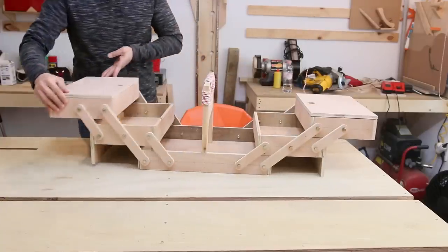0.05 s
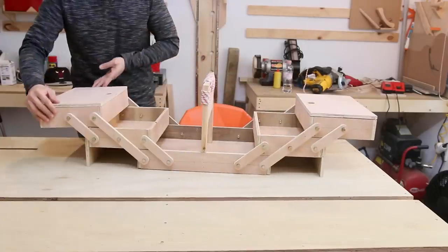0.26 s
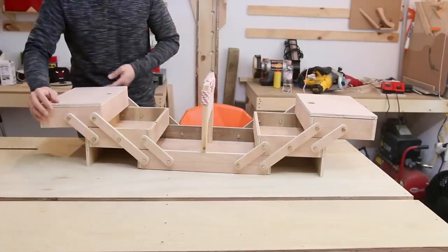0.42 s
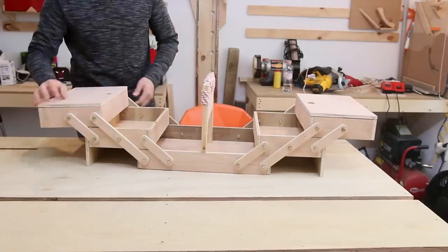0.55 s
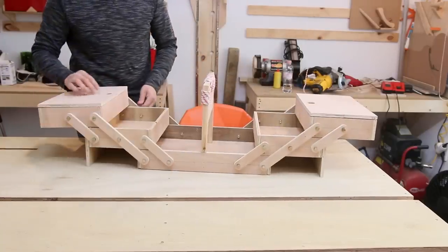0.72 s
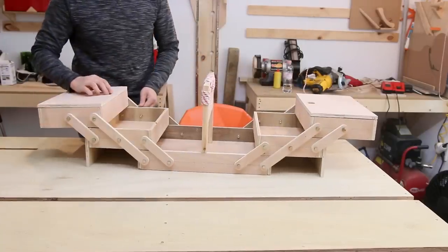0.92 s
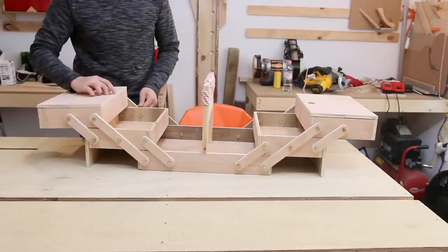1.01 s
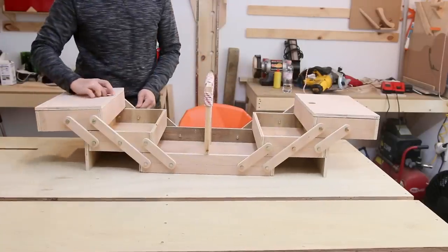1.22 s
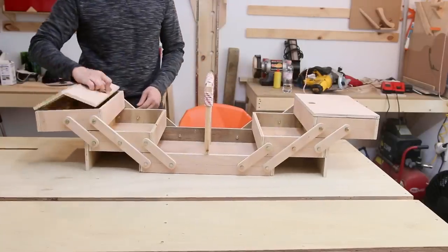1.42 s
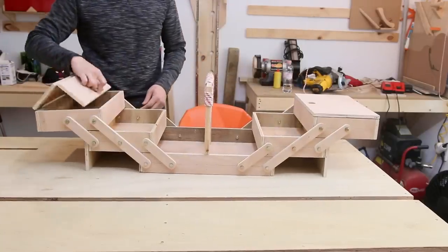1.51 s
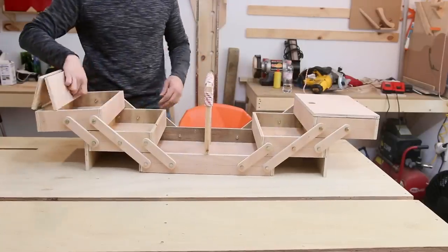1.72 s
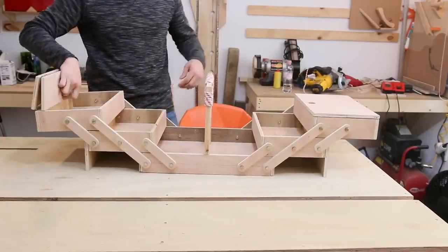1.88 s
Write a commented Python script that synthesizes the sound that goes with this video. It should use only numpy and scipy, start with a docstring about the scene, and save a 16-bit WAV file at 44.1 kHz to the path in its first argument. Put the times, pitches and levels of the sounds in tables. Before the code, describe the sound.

A wooden folding toolbox clatters open with a quick cluster of hollow knocks and a low bench thump, then faint finger taps, soft rubbing and a lighter lid knock in a small echoing workshop, heard fairly close.

```python
"""Wooden folding toolbox on a bench

Trays slide on their arms and clatter to a stop, fingers tap and slide over a lid, the lid swings up
and knocks on its stop. Knocks are short pushes and chatters ringing the wood; sliding is grainy noise.
The bench hums low from a few slow resonances, the workshop echoes the box, and quiet air lies behind."""
import sys
import numpy as np
from scipy import signal
from scipy.fft import rfft, irfft, next_fast_len
from scipy.io import wavfile
from scipy.ndimage import uniform_filter1d

SR = 44100
rng = np.random.default_rng(int(sys.argv[2]) if len(sys.argv) > 2 else 0)


def to_linear_factor(level_db):
    """Convert decibel levels (scalar or array-like) to linear amplitude factors."""
    exponent = np.asarray(level_db, float) / 20
    return 10 ** exponent


def generate_wav(signal):
    """Clip the signal to [-1, 1] and save it as 16-bit WAV at the path in sys.argv[1]."""
    frames = np.transpose(np.atleast_2d(signal))
    scaled = np.clip(frames, -1, 1) * 32767
    pcm = np.round(scaled).astype(np.int16)
    wavfile.write(sys.argv[1], SR, pcm)


N = 85995  # length in samples


def unit(x):
    """Scales a sound to an rms of 1."""
    return x / np.sqrt(np.mean(x ** 2) + 1e-20)


def along(points, hz):
    """Reads a curve of (Hz, value) points, with straight lines on a log frequency axis."""
    point_hz, value = np.transpose(points)
    return np.interp(np.log(hz + 1), np.log(point_hz + 1), value)


def filtered(x, response):
    """Multiplies the spectrum of x by a response, which is a function of frequency."""
    size = next_fast_len(N + SR // 2)
    hz = np.fft.rfftfreq(size, 1 / SR)
    return irfft(rfft(x, size) * response(hz), size)[..., :N]


def peak(f, hz, width_hz):
    """One resonance: it answers most strongly at hz and only after it is pushed."""
    return 1j * f * width_hz / (hz * hz - f * f + 1j * f * width_hz)


def wood(table):
    """Wood rings as a sum of resonances with alternating signs."""
    def response(f):
        return sum((-1) ** k * to_linear_factor(db) * peak(f, hz, width_hz)
                   for k, (hz, width_hz, db) in enumerate(table))
    return response


def spread(pair, alike, gain=lambda hz: 1):
    """Mixes two unrelated signals into a left and a right of the given likeness."""
    def mid_side_gain(hz):
        turn = np.arccos(np.clip(along(alike, hz), -1, 1)) / 2
        return gain(hz) * np.array([np.cos(turn), np.sin(turn)])
    mid, side = filtered(pair, mid_side_gain)
    return np.array([mid + side, mid - side])


def burst(length_s):
    """A gritty chatter of energy 1 that rises quickly and dies away."""
    rise_share, grit_db = 0.27, 5  # rise time as a share of the length; scatter of the grains
    u = np.arange(SR // 6) / (SR * length_s)
    noise, scatter = rng.standard_normal((2, len(u)))
    grains = noise * to_linear_factor(grit_db * scatter)
    x = grains * (1 - np.exp(-u / rise_share)) * np.exp(-2 * u)
    return x / np.linalg.norm(x)


def air():
    """The quiet workshop and the microphone's hiss: two noises, coloured and spread left and right."""
    # colour of the air: (pitch_hz, relative level_db)
    air_tone = [(15, -56), (45, -24.5), (70, -32.5), (130, 7), (200, -9), (320, -22), (800, -0.5),
                (1500, -10.5), (3000, -11.5), (6000, -15.5), (11500, -19.5), (12500, -36.5), (15500, -50.5)]
    # how alike left and right are: (pitch_hz, likeness from 0 to 1)
    air_alike = [(100, 1), (500, 0.7), (1500, 0.78), (4000, .1), (12000, .05)]
    noise = rng.standard_normal((2, N))
    return to_linear_factor(-75) * unit(spread(noise, air_alike, lambda hz: to_linear_factor(along(air_tone, hz))))


def workshop(x):
    """A fresh echo of the room: a noise tail in which each frequency dies at its own speed."""
    # time to die away by 60 dB: (pitch_hz, decay_s)
    decay = [(100, 0.29), (300, 0.33), (1000, 0.33), (2500, 0.32), (6000, 0.35), (12000, 0.6)]
    # how alike left and right are: (pitch_hz, likeness from 0 to 1)
    room_alike = [(100, 1), (400, 0.96), (1000, 0.82), (2500, 0.18), (6000, 0), (12000, 0.4)]
    gap_s = .004  # silence before the echo
    hz, t, grid = signal.stft(rng.standard_normal((2, SR)), SR, nperseg=256)
    fading = to_linear_factor(-60 * t / along(decay, hz)[:, None])
    tail = signal.istft(grid * fading, SR, nperseg=256)[1]
    tail = tail / np.linalg.norm(tail[0])
    late = np.pad(x, (round(gap_s * SR), 0))[None]
    echo = signal.fftconvolve(late, tail, axes=1)[:, :N]
    return spread(echo, room_alike)


def bench():
    """Weight arrives on the heavy top, which swells slowly into its low notes."""
    # weight arriving: (start_s, force_db)
    loads = [(0.252, 9.5), (0.29, 17), (0.498, -5.5), (1.305, -13), (1.77, -45), (1.878, -39)]
    # notes of the bench top: (pitch_hz, width_hz, level_db)
    notes = [(44.6, 13, -25), (84, 8, -12), (99.3, 4.7, -18), (156.2, 6.1, 9)]
    swell_hz = 25.7  # width of a second resonance on each note, for the slow build-up
    push = np.zeros(N)
    for start_s, force_db in loads:
        push[round(start_s * SR)] = to_linear_factor(force_db)

    def top(f):
        return sum(to_linear_factor(db) * peak(f, hz, width_hz) * peak(f, hz, swell_hz) for hz, width_hz, db in notes)
    return filtered(push, top)


def rub(curve, tone, grainy_db, fade_s):
    """Friction under a stroke: coloured noise of uneven grains, following a level curve, with echo."""
    point_s, db = np.transpose(curve)
    t = np.arange(N) / SR
    start, end = point_s[0], point_s[-1]
    fade = np.interp(t, [start - fade_s, start, end, end + fade_s], [0, 1, 1, 0])
    level = to_linear_factor(np.interp(t, point_s, db)) * fade
    unevenness = unit(uniform_filter1d(rng.standard_normal(N), size=150))
    grains = rng.standard_normal(N) * to_linear_factor(grainy_db * unevenness)
    x = level * unit(filtered(grains, lambda f: to_linear_factor(along(tone, f))))
    return x + to_linear_factor(3) * workshop(x)


def sliding_trays():
    """The trays slide: friction noise at the start."""
    # loudness of the slide before echo: (time_s, level_db)
    curve = [(0.0, -57.5), (0.034, -64), (0.21, -66.5)]
    # its colour: (pitch_hz, relative level_db)
    tone = [(60, -43.5), (150, -44), (280, 0.5), (350, -12.5), (480, 2.5), (570, -2.5), (700, -1),
            (1100, -4), (1600, -6), (4000, -15.5), (14000, -32.5), (16000, -62.5)]
    return rub(curve, tone, grainy_db=2.5, fade_s=0.084)


def hand_on_lid():
    """A hand strokes the lid: friction noise that comes and goes."""
    # loudness of the hand before echo: (time_s, level_db)
    curve = [(0.95, -73), (1.006, -83.5), (1.022, -90), (1.052, -74.5), (1.148, -62.5), (1.336, -57),
             (1.38, -65.5), (1.442, -91), (1.46, -68.5)]
    # its colour: (pitch_hz, relative level_db)
    tone = [(60, -54.5), (190, -27), (270, -7), (330, -4.5), (450, -6.5), (570, -11.5), (860, -6),
            (950, -10.5), (1300, -12.5), (2000, -20), (2500, -18), (2800, -25), (3200, -20.5), (6000, -31),
            (12000, -43), (16000, -59)]
    return rub(curve, tone, grainy_db=0, fade_s=0.065)


def hinge():
    """The lid's hinge rubs: friction noise of uneven grains."""
    # loudness of the hinge before echo: (time_s, level_db)
    curve = [(1.46, -86), (1.47, -97), (1.482, -78), (1.52, -68), (1.552, -78.5), (1.606, -69),
             (1.706, -77), (1.73, -82)]
    # its colour: (pitch_hz, relative level_db)
    tone = [(100, -19.5), (300, -7.5), (700, -4.5), (1300, -10), (3300, -16), (4100, -10), (5000, -20),
            (6300, -20.5), (12000, -43), (16000, -66)]
    return rub(curve, tone, grainy_db=4, fade_s=0.025)


def lid_drag():
    """The lid drags on its stop: friction noise, mostly low."""
    # loudness of the drag before echo: (time_s, level_db)
    curve = [(1.77, -52.5), (1.896, -59.5), (1.914, -46.5), (1.928, -56), (1.95, -43)]
    # its colour: (pitch_hz, relative level_db)
    tone = [(71, -43), (120, -22), (389, 2), (652, -14), (765, -10.5), (1090, -19.5), (1500, -14.5),
            (3990, -28.5), (10200, -52.5), (14000, -53)]
    return rub(curve, tone, grainy_db=-5.5, fade_s=0.018)


def clicks():
    """Hard edges touch: short chatters filtered to be all treble."""
    # touches: (start_s, level_db before colouring, length_s)
    touches = [(0.234, -48, 0.0057), (0.284, -53, 0.023), (0.305, -79, 0.0067), (1.313, -51.5, 0.0019),
               (1.741, -59, 0.011)]
    # colour of the clicks: (pitch_hz, gain_db)
    tone = [(2000, -40.5), (4000, 2), (9000, -8.5), (13800, -14), (15000, -10), (16000, -30.5)]
    out = np.zeros(N + SR)
    for start_s, db, length_s in touches:
        chatter = to_linear_factor(db) * np.sqrt(length_s * SR) * burst(length_s)
        out[round(start_s * SR):][:SR // 6] += chatter
    x = filtered(out[:N], lambda f: to_linear_factor(along(tone, f)))
    return x + to_linear_factor(-6.5) * workshop(x)


def blows(table, body, spread_share, push_share, order):
    """Each contact is partly a clean push, partly a chatter around its own pitch, ringing the body."""
    push_lag_s = 0.002019  # the push comes just after first touch
    level_s = .03  # a level means the rms the hit would have if squeezed into this time
    out, size = np.zeros(N + SR), SR // 2
    share = np.clip(push_share, 0, 1)
    f = np.fft.rfftfreq(size, 1 / SR)
    ringing = wood(body)(f)
    for start_s, db, pitch_hz, length_s in table:
        push = np.exp(-2j * np.pi * f * push_lag_s) / (1 + 1j * f / pitch_hz)
        chatter = rfft(burst(length_s), size)
        force = np.sqrt(share) * push + np.sqrt(1 - share) * chatter
        # the contact favours its own pitch and softens the treble
        contact = peak(f, pitch_hz, spread_share * pitch_hz) ** order / (1 + 1j * f / (2 * pitch_hz))
        hit = irfft(force * ringing * contact, size)
        out[round(start_s * SR):][:size] += to_linear_factor(db) * np.sqrt(level_s * SR) * hit / np.linalg.norm(hit)
    return out[:N]


def knocks():
    """Trays, a loose part and the lid ring when struck; soft fingers wake a narrower band."""
    # trays landing: (start_s, level_db before echo, pitch_hz of contact, length_s of chatter)
    tray_knocks = [(.2245, -27.5, 560, 0.0099), (.232, -37.5, 1500, 0.014), (.244, -26.5, 496, 0.013),
                   (.258, -48.5, 600, 0.012), (.2715, -38, 2973, .012), (.273, -24, 1000, 0.0054),
                   (.284, -27.5, 514.5, 0.0088), (.296, -29.5, 914, .006), (.315, -41, 998, 0.017),
                   (.335, -39.5, 843, 0.0055)]
    # fingers and small settling taps on the box: (start_s, level_db, pitch_hz, length_s), as above
    taps = [(.608, -65, 380, 0.017), (.713, -68, 843, .02), (.863, -66.5, 850, 0.0249),
            (.872, -61, 270, 0.029), (.893, -65, 291, 0.013), (.922, -75.5, 279, 0.03),
            (1.013, -64.5, 293, 0.019), (1.465, -66.5, 1090, 0.026), (1.485, -62.5, 515, 0.019),
            (1.51, -88, 600, 0.028), (1.606, -83, 3000, 0.0024)]
    # the loose small part shifting: (start_s, level_db, pitch_hz, length_s), as above
    jingles = [(.602, -80.5, 5800, 0.012), (.651, -73, 3520, 0.015), (.663, -71.5, 2515, 0.012)]
    # lid against its stop: (start_s, level_db, pitch_hz, length_s), as above
    lid_knocks = [(1.736, -39.5, 1100, 0.033), (1.754, -52, 600, 0.0064), (1.784, -49, 450, 0.023),
                  (1.822, -57, 1600, 0.0069), (1.905, -57, 453, 0.0202), (1.935, -56.5, 760, 0.014)]
    # resonances of the trays: (pitch_hz, width_hz, relative level_db)
    trays = [(200.8, 13, -11), (269.6, 37, -4), (348.5, 38, -1.5), (393.7, 14, -2.5), (438.8, 20, -1),
             (497.9, 20, 2.5), (567, 35, -3.5), (615.4, 33, -6.5), (665, 31, -4.5), (751, 68, -5.5),
             (850, 41, -2), (955, 68, -8), (1100, 116, -8.5), (1375, 227, -14), (1710, 270, -14),
             (1906, 180, -11), (2300, 350, -18), (2750, 390, -18), (3130, 350, -19), (3576, 400, -19),
             (5170, 1400, -27), (11000, 17000, -59)]
    # resonances of the loose small part: (pitch_hz, width_hz, relative level_db)
    fitting = [(1414, 90, 6.5), (1970, 100, 2.5), (2770, 150, -4), (3160, 270, -8.5), (3880, 260, -7.5),
               (5800, 280, -9)]
    # resonances of the lid: (pitch_hz, width_hz, relative level_db)
    lid = [(319.6, 23, 2), (436, 26, 9), (508, 34, 1.5), (600, 55, 2), (714, 36, 8.5), (760, 22, 4.5),
           (853, 32, -1.5), (1000, 52, -0.5), (1167, 77, -2), (1400, 80, -4.5), (1600, 120, -0.5),
           (1837, 79, -1), (2420, 250, -14), (2870, 400, -28.5), (5600, 9000, -9.5), (10700, 13000, -14.5)]
    rings = [blows(tray_knocks[:4], trays, spread_share=2.8, push_share=0.45, order=1),
             blows(tray_knocks[4:], trays, spread_share=1.5, push_share=0.55, order=1),
             blows(taps, trays, spread_share=1.5, push_share=0.12, order=2),
             blows(jingles, fitting, spread_share=1.2, push_share=0.11, order=1),
             blows(lid_knocks, lid, spread_share=1.5, push_share=0.31, order=1)]
    return sum(ring + to_linear_factor(2.5) * workshop(ring) for ring in rings)


def scene():
    """The box stands a little to the left: louder there, and a fraction of a sample earlier."""
    # how much louder left is than right: (pitch_hz, level_db)
    left_bias = [(300, 0), (1000, 1), (3000, 1.7), (12000, 3)]
    rubbing = sliding_trays() + hand_on_lid() + hinge() + lid_drag()
    box = bench() + rubbing + clicks() + knocks()

    def to_the_left(hz):
        balance = to_linear_factor(along(left_bias, hz) / 2 * np.array([[1], [-1]]))
        lead_samples = np.array([[.8], [0]])
        return balance * np.exp(2j * np.pi * hz / SR * lead_samples)
    return air() + filtered(box, to_the_left)


def roll_off(x):
    """The treble ends steeply here."""
    return signal.sosfilt(signal.butter(12, 15710, fs=SR, output="sos"), x)


def record(dry):
    """Turns the mixed scene into the finished sound."""
    return roll_off(dry)


dry = scene()
out = record(dry)
generate_wav(out)
```